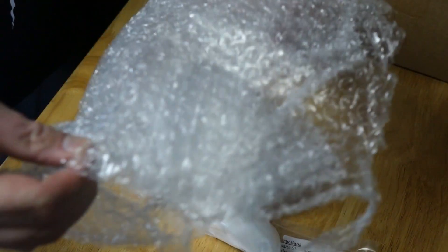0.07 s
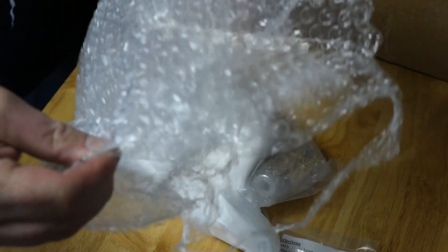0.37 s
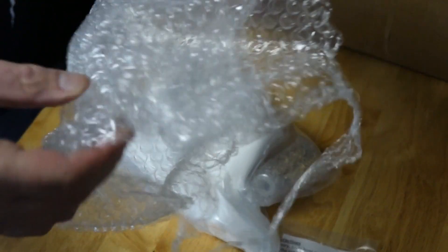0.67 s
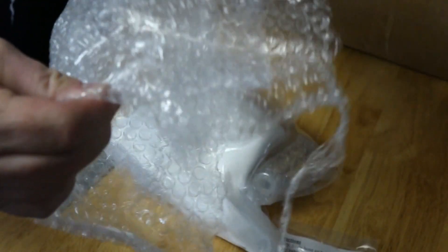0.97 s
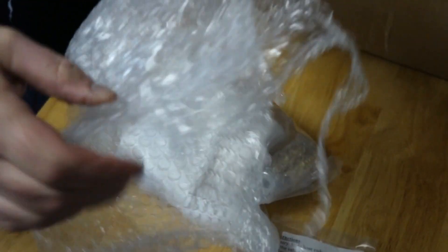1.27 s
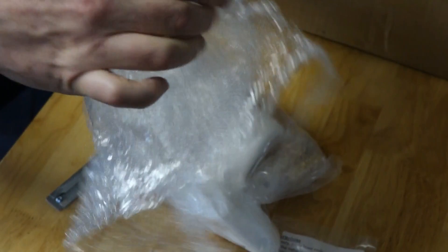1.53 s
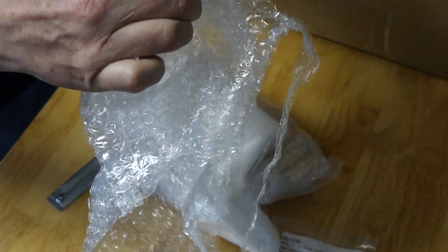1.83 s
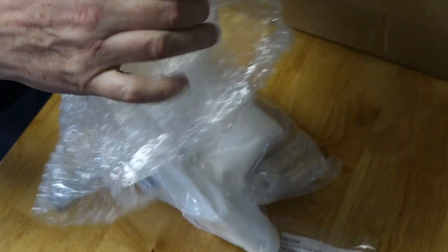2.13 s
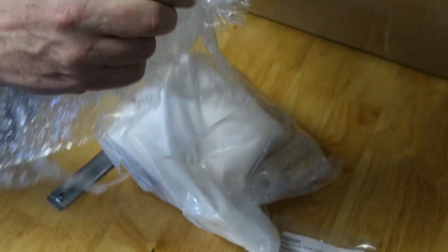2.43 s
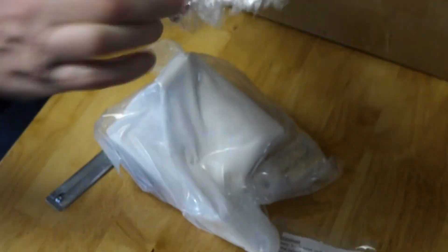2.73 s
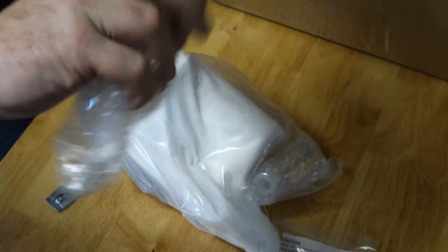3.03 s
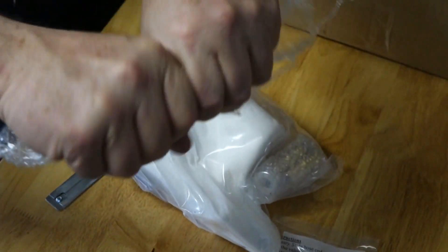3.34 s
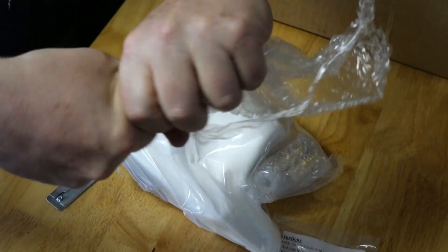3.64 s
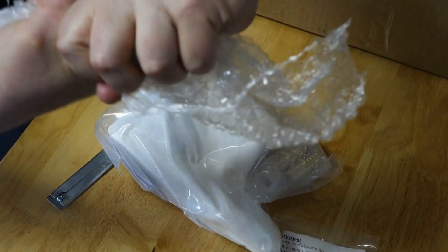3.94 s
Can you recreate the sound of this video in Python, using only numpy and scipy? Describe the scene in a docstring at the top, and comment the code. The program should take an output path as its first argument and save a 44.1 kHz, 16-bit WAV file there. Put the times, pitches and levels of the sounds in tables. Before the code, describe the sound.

Scattered sharp pops of bubble wrap snap over a plastic rustle, close up in a small, quiet room. The crinkling grows louder, then a twist sets off a rapid run of pops, with faint rumble and hiss underneath.

```python
"""Hands fold a sheet of bubble wrap close to the microphone, over rumble, hiss and a low hum that fades early.
From the first instant cells burst with sharp pops that overload the microphone and ring in a small room.
The film rustles with thousands of tiny buckles, creases tick, the sheet bumps and pushes puffs of air.
After two seconds the rustle swells as the sheet is gathered up. In the last second it is wrung:
taut cells slip against each other with pings and burst in a quick volley."""
import sys
import numpy as np
from scipy import signal
from scipy.fft import rfft, irfft, next_fast_len
from scipy.io import wavfile

SR = 44100
rng = np.random.default_rng(int(sys.argv[2]) if len(sys.argv) > 2 else 0)


def waveform_to_disk(signal):
    """Save audio, clipped to [-1, 1], as 16-bit WAV at the path in sys.argv[1]."""
    frames = np.transpose(np.atleast_2d(signal))
    scaled = np.clip(frames, -1, 1) * 32767
    samples = np.round(scaled).astype(np.int16)
    wavfile.write(sys.argv[1], SR, samples)


N = 176400
T = np.arange(N) / SR

# Fader ride of the handling rumble. Each row: time in seconds, level in dB.
RUMBLE_RIDE = [(0, -32), (1.3, -35.5), (2.2, -38.5), (3.2, -44.5), (4, -51)]
# Tones of the hum. Each row: pitch in Hz, level in dB before the fade, depth of the waver as a share.
HUM_TONES = [(58.5, -41.5, 0.13), (195.8, -42, 0.6), (245, -48, 1)]
# Fade of the hum. Each row: time in seconds, gain in dB.
HUM_FADE = [(0, 5), (.52, 4.5), (.7, -15)]
# Cells bursting. Each row: start in seconds, level in dB, sputter length in ms, then body, mids,
# crack, room tail level and tail treble, all in dB.
CELL_POPS = [(0.0005, -7.5, 1.2, 0, 0.5, 8, -16, -6), (0.3161, -11, 1, 2, -11, -17, -27.5, -4),
             (0.4640, -6.5, 0.49, 5.5, 3, 2, -18.5, -3.5), (0.5363, -4.5, .3, 3.5, -8, 9.5, -23, -5.5),
             (0.9416, -1, 2.8, 2, 1.5, 12, -16, -5.5), (1.2484, -9.5, 2.4, 9.5, 4, 9, -27.5, -14),
             (1.3319, -10, 0.42, -15, -34, 0, -46, 0), (1.3701, -3, 1.5, -11, -8.5, -1, -25.5, -8),
             (1.6407, -15, .3, -14, 0, -6, -27, -11), (1.716, -1, 1, 3.5, 3.5, -26, -15.5, -17),
             (1.7462, 1, 1.9, -14, 2, -7, -17, -7), (1.7727, -3, 2.5, 2, 2.5, -2, -13.5, -12),
             (1.8135, -3.5, 2, 3.5, -8, 10, -15.5, -2.5), (2.0033, -4.5, 0.35, -15, 4.5, 7, -26.5, -12),
             (3.3044, -5, 1.6, 3, -2, 3.5, -14.5, -6), (3.3475, -5.5, 1.8, 4, 2, 6, -23.5, -18),
             (3.3677, -0.5, 1.7, 3, 2.5, 18.5, -17, -1.5), (3.4543, 1, 1.8, -1.5, -12, 13, -16.5, -7),
             (3.4926, -4, 2, -2, 3.5, 5.5, -17, -3), (3.5300, -4.5, 2.1, -3.5, -3.5, 14, -14.5, -8),
             (3.539, -2.5, 0.82, -6, -14, 13, -26, 1), (3.571, 0, 2.4, -4, -9, 11.5, -17.5, -10),
             (3.6027, -1.5, 1.7, -5, 0.5, 13, -17, -5), (3.6364, 1.5, 4.2, 2, -1, 5, -20, -25),
             (3.6590, -15, .5, -11, -21, 7, -14, -26), (3.7248, -2.5, 2.04, 1.5, 5, 7.5, -15, -5.5),
             (3.755, -5.5, 3.3, 3, 1, 2, -31, -15), (3.7630, -3, 6.5, -4.5, -1, -24, -16, -39),
             (3.8059, -5, 2.4, -2.5, -6, 2.5, -16.5, -12), (3.8317, 3, 2, -2, -8, 3.5, -21, 2),
             (3.8549, -9, 2, -5.5, -8, 3, -13, -6.5), (3.978, -12, 2.9, 7, -2, 4, -32, 10),
             (3.9923, -5.5, 1, 8.5, 6, 10.5, -25, 2)]
# The hands working the film. Each row: time in seconds, rustle level in dB, lows in dB, treble in dB.
HAND_MOVES = [(0.11, -32, -1, -3), (0.2, -40, 8.5, 6.5), (0.26, -29, 2.5, 8), (0.33, -23, -5, -7),
              (0.37, -36.5, 8, 2), (0.42, -30, -3, 6), (0.45, -32.5, 0, -5), (0.62, -35.5, 2.5, -2),
              (0.69, -38, 5, 9), (0.725, -29, 2.5, 10), (0.81, -28.5, -1, -3), (0.86, -42, 8.5, 11.5),
              (0.92, -34.5, 4.5, 8.5), (1.05, -35.5, 2.5, -13), (1.09, -29.5, -3.5, -1),
              (1.26, -32.5, 0.5, 7.5), (1.32, -25, -6, -6), (1.46, -39.5, 6, 4), (1.51, -30.5, 3, 9),
              (1.575, -22.5, 1, 0), (1.615, -34, 2.5, 3), (1.69, -32, -2.5, -1), (1.93, -30.5, -9, -4.5),
              (1.99, -34, -1, 8), (2.055, -26.5, -5.5, 3), (2.1, -21, -0.5, 2.5), (2.19, -29, 5, 6),
              (2.225, -21.5, 3, 7), (2.25, -17.5, 2.5, 6.5), (2.335, -14.5, -6.5, -5.5),
              (2.39, -22.5, -6.5, -4), (2.465, -35, -0.5, 2.5), (2.52, -19, -4.5, -1),
              (2.655, -18, -7.5, -5), (2.705, -18, -0.5, -3), (2.76, -16, -7.5, -5.5), (2.8, -34, 1.5, 4),
              (2.9, -22.5, -1.5, 1.5), (3.04, -16.5, -9.5, -4), (3.105, -21.5, -12, 3),
              (3.135, -25.5, -17, 2), (3.28, -34, -13, 9), (3.44, -31, -1.5, -2), (3.58, -30, 6.5, -1),
              (3.69, -31, 4.5, -12), (3.97, -31, -5, -24)]
# Registers of the crackle. Each entry: a band edge in Hz.
CRACKLE_EDGES_HZ = [2500, 6000, 9600, 15500]
# Creases snapping over. Each row: start in seconds, level in dB, brightness in dB.
CREASE_TICKS = [(0.102, -24, 11), (0.422, -29, 4), (0.432, -25, 4), (0.469, -15, 1), (0.709, -27, 3),
                (0.725, -20, -6), (0.7627, -23.5, -2), (0.8041, -12, -6), (0.9066, -31, 1),
                (0.9694, -13.5, 4), (1.0797, -25, 10), (1.1464, -26, 6), (1.2314, -24, -1),
                (1.5028, -25, 6), (1.6334, -15, -11.5), (1.654, -25, 2), (2.103, -16, -6), (3.114, -14, 0),
                (3.1512, -19.5, 22), (3.187, -18, 9), (3.2909, -21, 0), (3.3815, -14, 12), (3.577, -10, -1),
                (3.5875, -18, 1)]
# Bumps of the air-filled sheet, and at 0.464 s the low ring of the cell bursting then. Each row: start in
# seconds, level in dB, pitch in Hz, t60 in seconds.
SHEET_BUMPS = [(0.228, -23, 715, 0.052), (0.464, -13, 656, 0.012), (0.475, -24.5, 475, 0.27),
               (0.97, -31.5, 247, 0.06), (2.238, -18, 203, 0.046)]
# Air pushed at the microphone. Each row: time of the peak in seconds, level in dB, pitch in Hz.
AIR_PUFFS = [(0.34, -29, 38), (0.728, -31.5, 55.7), (0.818, -30, 41.3), (1.098, -32, 61.6),
             (1.28, -27.5, 30), (2.52, -30, 36.7), (2.77, -29.5, 35.6)]
# Single slips of taut cells. Each row: start in seconds, level in dB.
SLIP_PINGS = [(1.298, -15), (1.3526, -26), (1.6924, -24), (3.0624, -10), (3.326, -19), (3.5426, -13),
              (3.6248, -14), (3.6688, -18), (3.6743, -18)]
# Fader ride of the small pings during the wringing. Each row: time in seconds, level in dB.
WRING_RIDE = [(3.3, -55), (3.47, -32), (3.66, -26), (3.88, -31), (3.95, -42)]

# EQ curves that voice each layer. Each row: frequency in Hz, gain in dB.
RUMBLE_EQ = [(12, 14), (32, 4), (50, 2), (75, -5), (110, -8.5), (200, -5.5), (500, -51)]
HISS_EQ = [(200, -6), (400, -2), (730, 6.5), (1200, -22), (3700, 8.5), (15500, -57)]
POP_EQ = [(100, -26), (350, -14), (550, -14.5), (730, -1.5), (1150, -10), (2200, -6.5), (2900, -4.5),
          (3650, 1), (4600, -6), (6000, -12), (10000, -19), (15500, -26.5)]  # a burst heard directly
TAIL_EQ = [(100, -18.5), (450, -14.5), (750, -4.5), (1150, -13), (2200, -6.5), (2700, -9.5), (3650, -0.5),
           (4600, -5), (6000, -6), (9000, -9), (12000, -19), (15500, -24)]  # a burst as the room returns it
RUSTLE_EQ = [(59, -19), (100, -6.5), (146, -13), (260, -5), (342, -8.5), (479, -7.5), (660, 2), (820, 1),
             (1030, -9), (1500, -6), (2610, -6.5), (3740, -5.5), (6220, -13), (11000, -13), (15800, -20)]
TICK_EQ = [(300, -11), (750, 2.5), (1300, -7.5), (3700, 3.5), (6000, 0.5), (10000, -3), (15500, -7.5)]  # crackle and creases

CELL_RING_HZ, CELL_PITCH_SPREAD = 3600, 0.096  # ring of the taut cells; share by which cells differ
SNAP_S = 0.0017  # a snap carries the energy of its level held this long


def from_db(db):
    """Decibels to gain."""
    return 10 ** (np.asarray(db) / 20)


def rms_one(x):
    """Scale to rms 1."""
    return x / np.sqrt(np.mean(x ** 2) + 1e-20)


def unit_energy(x):
    """Scale to energy 1."""
    return x / np.sqrt(np.sum(x ** 2) + 1e-20)


def ride(rows):
    """Each column of a timed table as a curve with a value at every sample."""
    times, *columns = np.transpose(rows)
    return [np.interp(T, times, column) for column in columns]


def place(out, start, x, level_db, held_s=SNAP_S):
    """Mix x in at start, with the energy of level_db held for held_s."""
    i = int(start * SR)
    hit = from_db(level_db) * np.sqrt(held_s * SR) * unit_energy(x)
    out[i:i + len(hit)] += hit[:N - i]


def eq(x, *curves):
    """Minimum-phase EQ, so attacks stay sharp; its gain is the sum of the (Hz, dB) curves."""
    n = 2 * next_fast_len(len(x) // 2 + 2048)
    log_hz = np.log(np.arange(n // 2 + 1) * SR / n + 1)
    gain_db = sum(np.interp(log_hz, np.log(hz), db) for hz, db in map(np.transpose, curves))
    cepstrum = irfft(np.log(from_db(gain_db)))
    cepstrum[1:n // 2] *= 2
    cepstrum[n // 2 + 1:] = 0
    return irfft(rfft(x, n) * np.exp(rfft(cepstrum)))[:len(x)]


def band(x, hz, kind, order=2):
    """Butterworth filter."""
    return signal.sosfilt(signal.butter(order, hz, kind, fs=SR, output="sos"), x + 1e-18)


def ring(x, hz, q):
    """The short pitched ring that x excites in taut cells."""
    return signal.lfilter(*signal.iirpeak(hz, q, fs=SR), x + 1e-18)


def drift(per_s):
    """A random wobble of rms 1 that turns per_s times a second."""
    return rms_one(np.interp(T * per_s, np.arange(4096), rng.standard_normal(4096)))


def clicks(per_s, spread_db):
    """Random clicks, many small and a few large; rms 1 at any rate."""
    sizes = from_db(spread_db * np.minimum(rng.exponential(1, N), 5))
    signs = rng.choice([-1, 1], N)
    fires = rng.random(N) < per_s / SR
    return rms_one(sizes * signs * fires / np.sqrt(per_s))


def room_response(low_t60_s=0.36, treble_t60_s=0.22, build_s=0.0039):
    """Diffuse reflections of a small room; the treble dies sooner."""
    t, noise = T[:SR // 2], rng.standard_normal(SR // 2)
    low = band(noise, 9600, "low", order=1)
    tail = low * from_db(-60 * t / low_t60_s) + (noise - low) * from_db(-60 * t / treble_t60_s)
    return unit_energy(tail * (1 - np.exp(-(t / build_s) ** 2)))


def in_room(x, room, wet_db):
    """Direct sound plus reflections."""
    return x + from_db(wet_db) * signal.fftconvolve(x, room)[:N]


def rumble():
    """Deep handling noise that ebbs away."""
    return from_db(ride(RUMBLE_RIDE)[0]) * rms_one(eq(rng.standard_normal(N), RUMBLE_EQ))


def hum():
    """Low tones that waver in level and phase and drop back early."""
    out = np.zeros(N)
    for hz, level_db, depth in HUM_TONES:
        waver = 1 + depth * (drift(per_s=50) + 1j * drift(per_s=50)) / np.sqrt(2)
        tone = np.exp(2j * np.pi * (hz * T + rng.random()))
        out += from_db(level_db) * rms_one(np.real(waver * tone))
    return out * from_db(ride(HUM_FADE)[0])


def hiss(level_db=-38):
    """A steady bed of quiet room tone."""
    return from_db(level_db) * rms_one(eq(rng.standard_normal(N), HISS_EQ))


def cell_pitch():
    """The pitch in Hz of one cell picked at random."""
    return CELL_RING_HZ * (1 + CELL_PITCH_SPREAD * rng.uniform(-1, 1))


def snap(length_ms, tears_per_s=3700, sputter_db=-6.5, second_snap_db=-3):
    """One sharp release, then a second snap amid a brief sputter as the film tears."""
    ms = T[:2048] * 1000
    tears = rng.standard_normal(len(ms)) * (rng.random(len(ms)) < tears_per_s / SR)
    x = from_db(sputter_db) * tears * np.exp(-(ms / length_ms) ** 2 / 2)
    x[0] = -1
    x[np.argmin(abs(ms - 0.75 * length_ms))] -= from_db(second_snap_db)
    return x


def pops(room, ring_db=-8, own_share=0.46):
    """Each cell bursts with its own colour, rings its neighbours and excites the room from its spot."""
    out = np.zeros(N)
    for start, level_db, length_ms, body_db, mid_db, crack_db, tail_db, tail_treble_db in CELL_POPS:
        burst = snap(length_ms)
        burst += from_db(ring_db) * ring(burst, cell_pitch(), q=7.1)
        cell_eq = [(750, body_db), (1800, mid_db), (3600, 0)]
        direct = eq(burst, POP_EQ, cell_eq, [(4200, 0), (8000, crack_db)])
        place(out, start, direct, level_db)
        reflections = (1 - own_share) * room + own_share * room_response()
        tail = eq(reflections, TAIL_EQ, cell_eq, [(4200, 0), (8000, tail_treble_db)])
        place(out, start, tail, tail_db, held_s=0.025)
    return out


def rustle(room, low_hz=2100, treble_hz=6000, clump_db=2.0, ring_db=-2.5):
    """Tiny buckles in the film come in clumps, faster and louder as the hands work harder."""
    level_db, low_db, treble_db = ride(HAND_MOVES)
    buckles_per_s = 4500 * from_db(level_db - level_db.mean())
    buckles = clicks(buckles_per_s, spread_db=2.5) * from_db(clump_db * drift(per_s=130))
    buckles += from_db(ring_db) * ring(buckles, CELL_RING_HZ, q=6)
    film = rms_one(eq(in_room(buckles, room, wet_db=-12), RUSTLE_EQ))
    lows = from_db(low_db) * band(film, low_hz, "low")
    mids = band(band(film, low_hz, "high"), treble_hz, "low")
    treble = from_db(treble_db) * band(film, treble_hz, "high")
    return from_db(level_db) * (lows - mids + treble)  # mids flipped so the crossovers do not notch


def crackle(per_s=90, spread_db=3.5, trim_db=-20.5, follow=0.51):
    """Sparse bright ticks, narrow or full-range, that follow about half the swing of the rustle's treble."""
    level_db, _, treble_db = ride(HAND_MOVES)
    registers = zip(CRACKLE_EDGES_HZ, CRACKLE_EDGES_HZ[1:])
    narrow = sum(band(clicks(per_s, spread_db), edges, "band") for edges in registers)
    ticks = rms_one(eq(narrow + 0.5 * clicks(per_s, spread_db), TICK_EQ))
    return from_db(trim_db + follow * (level_db + treble_db)) * ticks


def creases(room):
    """Single folds snap over with a crisp tick that the room returns."""
    out = np.zeros(N)
    for start, level_db, bright_db in CREASE_TICKS:
        tilt = [(1200, -bright_db), (3600, 0), (9000, bright_db)]
        place(out, start, eq(snap(length_ms=0.94), TICK_EQ, tilt), level_db)
    return in_room(out, room, wet_db=-6)


def bumps(edge_ratio=1.12):
    """Hollow, quickly dying thuds of the air-filled sheet, and the low ring of one bursting cell."""
    out, t = np.zeros(N), T[:SR // 2]
    for start, level_db, hz, t60 in SHEET_BUMPS:
        push = rng.standard_normal(len(t)) * from_db(-60 * t / t60)
        thud = band(push, [hz / edge_ratio, hz * edge_ratio], "band")
        place(out, start, thud, level_db, held_s=t60 / 10)
    return out


def puffs(width_s=0.016):
    """Each puff of air sways the microphone for a cycle or two."""
    out = np.zeros(N)
    for peak, level_db, hz in AIR_PUFFS:
        swell = np.exp(-((T - peak) / width_s) ** 2 / 2)
        out += from_db(level_db) * np.sqrt(2) * swell * np.sin(2 * np.pi * hz * (T - peak))
    return out


def pings(swarm_per_s=230, q=14):
    """Taut cells slip and ring for a few cycles: single loud pings, and a swarm during the wringing."""
    pitches = np.geomspace(2960, 5200, 8)
    swarm = sum(ring(clicks(swarm_per_s / len(pitches), spread_db=-2.5), hz, q) for hz in pitches)
    out = from_db(ride(WRING_RIDE)[0]) * rms_one(swarm)
    for start, level_db in SLIP_PINGS:
        hz = cell_pitch()
        place(out, start, ring(snap(length_ms=0.92), hz, q), level_db)
    return out


def scene():
    """The bubble wrap up front and a quiet bed beneath it, in mono."""
    room = room_response()
    wrap = rustle(room) + crackle() + pops(room) + creases(room) + pings() + bumps() + puffs()
    bed = rumble() + hum() + hiss()
    return (wrap + bed)[None]


def record(dry, overload=0.9, cutoff_hz=15800):
    """The pops clip the microphone, and a steep low-pass takes off the very top."""
    clipped = np.clip(dry, -overload, overload)
    return signal.sosfilt(signal.ellip(10, .1, 70, cutoff_hz, fs=SR, output="sos"), clipped)


dry = scene()
out = record(dry)
waveform_to_disk(out)
```